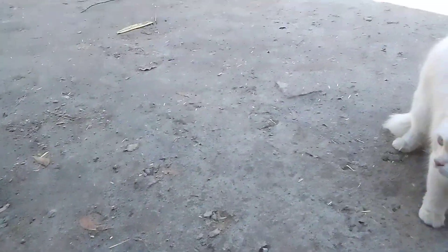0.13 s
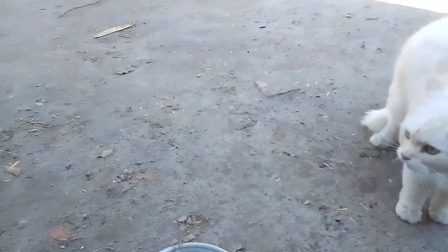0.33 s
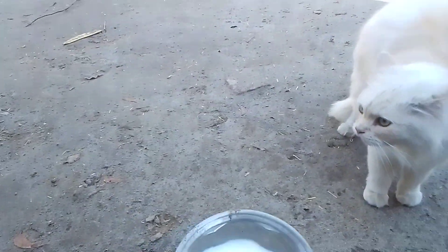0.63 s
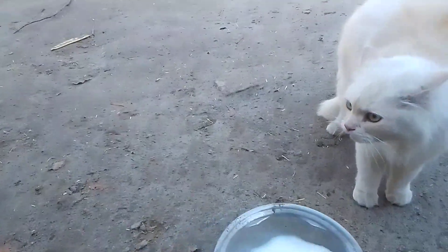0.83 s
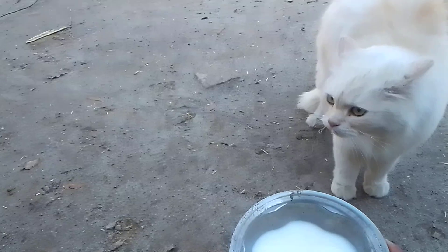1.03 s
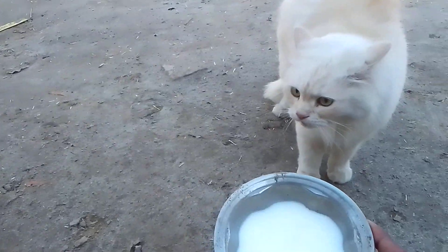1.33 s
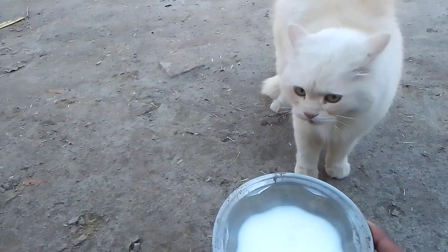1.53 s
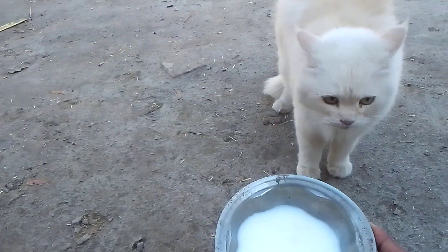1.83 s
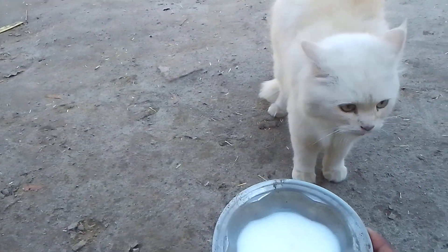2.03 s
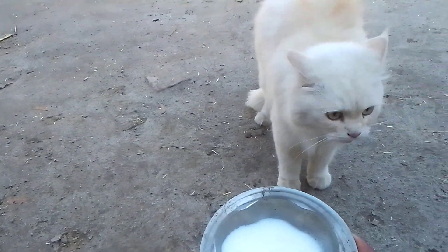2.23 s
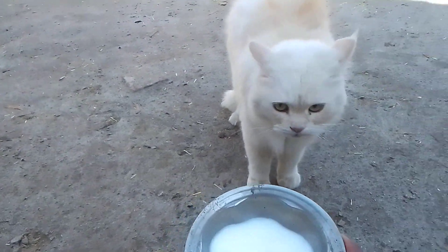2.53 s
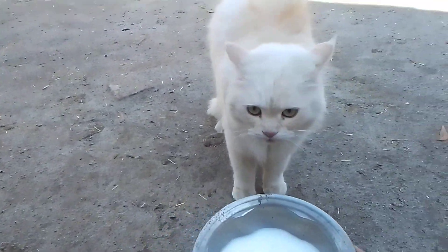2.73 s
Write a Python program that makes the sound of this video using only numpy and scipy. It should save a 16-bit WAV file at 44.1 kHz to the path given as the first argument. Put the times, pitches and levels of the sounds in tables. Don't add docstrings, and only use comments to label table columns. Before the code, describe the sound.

A cat yowls close by for the whole three seconds: a quiet closed-mouth hum until 0.25, then a wide, rough, raspy cry from 0.4 to 1.4, creeping up in pitch, clearer and highest near 1.9, then wavering, dropping and closing to a soft nasal hum. Faint yard murmur and hiss, tiny ticks, a dry click at 2.6, then a faint distant hoarse call and bird peep. Small microphone, little echo.

```python
import sys
import numpy as np
from scipy import signal
from scipy.fft import rfft, irfft, next_fast_len
from scipy.io import wavfile
from scipy.ndimage import uniform_filter1d, map_coordinates

SR = 44100
rng = np.random.default_rng(int(sys.argv[2]) if len(sys.argv) > 2 else 0)


def to_linear_factor(level_db):
    exponent = np.asarray(level_db, float) / 20
    return 10 ** exponent


def transcribe(signal):
    frames = np.atleast_2d(signal).T
    limited = np.clip(frames, -1, 1)
    pcm = np.round(limited * 32767).astype(np.int16)
    wavfile.write(sys.argv[1], SR, pcm)


N = 127890
STEP = 128

# (frequency [Hz], level [dB]); the last bounds them on both sides
MURMUR_SPECTRUM = [(20, -4.5), (55, -8), (150, -23), (270, -36.5), (380, 10), (1700, -5), (4700, -8.5),
                   (5600, -23)]
HISS_SPECTRUM = [(3000, -3), (10500, -1), (11650, 0), (12000, -12), (12350, 0), (15700, 1)]
SPECTRUM_ENDS = [(1, -60), (16500, -60)]
# (time [s], level [dB])
MURMUR_SWELL = [
    (0, -1.5),
    (1.5, -3.5),
    (2.3, -1),
    (2.7, -0.5),
    (2.88, 5.5),
]
MURMUR_DB, HISS_DB, PATCHY_DB = -68, -83.5, 1.5
HUM_HZ, HUM_DB = 206.5, -94.5

# (time [s], pitch [Hz])
CAT_PITCH = [(0, 392), (.12, 390), (.2, 382), (.3, 374), (.37, 376), (.41, 391), (.52, 402), (.64, 403),
             (.655, 410), (.72, 416), (.84, 431), (1.07, 433), (1.14, 442), (1.45, 444), (1.6, 451),
             (1.92, 464), (2.04, 457), (2.283, 436), (2.297, 412), (2.5, 390), (2.66, 337), (2.9, 335)]
# (time [s], pitch change [share], width [s])
PITCH_BENDS = [(2.06, -.038, .014), (2.085, .025, .008), (2.11, -.038, .018), (2.145, .015, .012),
               (2.176, -.05, .013), (2.21, .02, .025), (2.25, -.012, .01), (2.385, .025, .02),
               (2.42, -.022, .015), (1.715, .018, .015), (1.995, -.017, .014), (1.58, .015, .008),
               (.427, -.015, .008), (2.725, -.03, .012), (2.84, -.035, .02), (.447, .018, .008),
               (.47, -.018, .012), (.925, -.009, .008), (.98, -.012, .014), (1.075, -.015, .01),
               (1.19, -.01, .012), (1.283, -.012, .008), (1.335, .011, .01), (1.455, -.008, .012),
               (1.48, .012, .007), (1.525, .008, .012), (1.545, -.014, .008), (1.675, -.007, .01),
               (1.765, -.012, .014), (1.8, -.014, .01), (1.885, -.016, .008), (1.935, -.012, .006)]
# (time [s], level [dB])
CAT_EFFORT = [(0.0, -56), (0.04, -54), (0.19, -54), (0.3, -43.5), (0.44, -42), (.47, -41.5), (0.56, -43.5),
              (0.69, -38.5), (.78, -39), (.83, -39), (1.0, -40.5), (1.44, -41.5), (1.64, -39.5), (1.9, -43),
              (2.1, -48.5), (2.28, -49), (2.37, -50.5), (2.6, -52.5), (2.9, -52.5)]
# (time [s], half-pitch lines [dB], same high up [dB], breath [dB])
FOLD_STATE = [(0, -40, -30, -26), (.3, -38, -35, -28), (.36, -20, -20, -24), (.43, -3, -5, -14),
              (.5, 0, 0, -22), (.66, 0, 2, -22), (.8, 0, 2, -28), (1.1, -1, 3, -28), (1.27, -3, 3, -27),
              (1.4, -12, 0, -27), (1.52, -13, -2, -26), (1.62, -2, -2, -25), (1.69, -12, -12, -25),
              (1.75, -35, -30, -26), (1.95, -18, -22, -20), (2.2, -17, -22, -17), (2.33, -35, -30, -26),
              (2.6, -30, -30, -25), (2.9, -25, -25, -21)]
# (frequency [Hz], breath against lines [dB], half-pitch lines [dB])
SOURCE_TILT = [(200, 17, 8), (370, 0, -12.5), (740, -9.5, -8.5), (1270, -1, -3.5), (2400, 6.5, -2.5),
               (6000, 11, -4.5)]
# (time [s], mouth [Hz], tongue [Hz], mouth opening [dB], jaw drop [dB], brightness [dB])
MOUTH_SHAPE = [(0, 716, 2400, -13, -19, -19.5), (.18, 828, 2580, -2.5, -41, -16.5),
               (.26, 790, 2340, 13.5, -23, -9.5), (.31, 740, 2223, 14.5, -7, 2.5),
               (.43, 820, 2350, 12.5, -8.5, -5.5), (.58, 910, 2330, 14.5, -16, -8),
               (.7, 884, 2400, 14, -14, -4.5), (.85, 922, 2440, 15.5, -18, -4.5),
               (1.05, 866, 2350, 13.5, -13.5, -9), (1.2, 865, 2240, 12, -31.5, -10.5),
               (1.47, 905, 2300, 16, -34.5, -8.5), (1.75, 876, 2414, 19.5, -41, -11),
               (2.02, 883, 2210, 12.5, -38.5, -10), (2.27, 872, 2200, 5, -26, -11),
               (2.32, 817, 2110, -2, -3.5, -9), (2.52, 775, 1944, -3, -7, -7),
               (2.64, 616, 2070, -12, 9.5, -4), (2.9, 645, 1880, -14.5, 5, -7)]
# (time [s], throat [Hz], palate [Hz], ridge [Hz])
UPPER_PLACES = [(0, 4150, 6120, 3150), (.3, 3950, 6020, 3050), (.5, 4070, 6100, 3050),
                (.6, 3980, 6000, 3100), (.69, 4060, 5950, 3150), (.75, 3960, 5700, 3250),
                (.84, 4050, 5850, 3330), (.9, 4520, 6300, 3330), (.97, 4500, 6300, 3250),
                (1.06, 4300, 6100, 3200), (1.12, 4190, 6000, 3250), (1.42, 4190, 6050, 3250),
                (1.5, 4090, 6070, 3200), (1.7, 4100, 6050, 3200), (2.05, 4150, 6010, 3200),
                (2.3, 4500, 6200, 2900), (2.9, 4400, 6200, 3300)]
# (time [s], throat [dB], palate [dB], ridge [dB])
UPPER_LEVELS = [(0, 12.5, -23, 6), (.15, 12.5, -6, -6), (.3, -18.5, -32.5, -46), (.45, -17.5, -25.5, -32),
                (.53, -12.5, -29, -18), (.6, -19.5, -29, -20.5), (.69, -12, -30, -28),
                (.78, -24, -29.5, -24), (.86, -24.5, -43, -23), (.95, -25.5, -35, -20.5),
                (1.06, -22, -32.5, -17.5), (1.12, -14.5, -27.5, -16.5), (1.45, -13.5, -24, -19),
                (1.6, -17, -15.5, -18), (1.72, -10, -25.5, -15), (1.88, -17.5, -21.5, -22.5),
                (2.05, -23.5, -31.5, -31.5), (2.3, -21, -35, -31), (2.9, -7.5, -13, -26)]
# (frequency [Hz], width [Hz], level against the mouth [dB])
FIXED_RESONANCES = [(1710, 860, -23), (2810, 180, -28.5), (5100, 300, -49.5), (6960, 350, -47.5)]
# (frequency [Hz], width [Hz], level [dB])
WIDE_JAW_RESONANCES = [(6450, 450, -27), (7600, 400, -27), (11500, 500, -40), (14900, 1300, -33)]
# (time [s], level [dB])
JAW_GAPE = [
    (.25, -33),
    (.34, -13),
    (.55, -12),
    (.65, -14),
    (.8, -23),
    (.95, -25),
    (1.1, -29),
]
# (time [s], share of the flutter)
NOSE_FLUTTER = [(0, .3), (1, .4), (1.7, 1.2), (2.25, 1.3), (2.32, .3), (2.75, .4), (2.9, 1)]
JITTER, SHIMMER_DB, DRIFT_DB, NOSE_FLUTTER_DB = .0038, .7, 1.5, 2.8
NOSE_HZ, NOSE_WIDE_HZ = 399, 273
MOUTH_WIDE_HZ, TONGUE_WIDE_HZ, TONGUE_DB = 229, 300, -8
JAW_OVER_MOUTH, JAW_WIDE_HZ = 1.43, 480
THROAT_WIDE_HZ, PALATE_WIDE_HZ, RIDGE_WIDE_HZ = 300, 340, 420
SIDE_HZ, SIDE_WIDE_HZ = 3686, 350
HIGH_FROM_HZ, SPREAD_HZ = 2350, 1500
FLICKER_DB, FLICKER_STEPS = 3, 8

# (time [s], peak [dB], frequency [Hz], t60 [s])
TICKS = [
    (2.6085, -46, 2700, .003),
    (2.6135, -49, 4100, .0025),
    (2.44, -56, 2200, .003),
    (1.308, -60, 8000, .002),
    (.008, -60, 4200, .002),
    (.04, -61, 7600, .003),
    (.0405, -62, 4800, .003),
    (.113, -61, 3800, .002),
    (.452, -58, 9000, .0015),
]
CLICK_RISE_S = .0003
# (time [s], pitch [Hz], level [dB], breath [dB])
FAR_VOICE = [
    (2.6, 512, -95, -12),
    (2.612, 510, -62, -14),
    (2.68, 497, -64, -10),
    (2.72, 478, -71, 1),
    (2.78, 470, -76, 3),
    (2.81, 475, -72, -8),
    (2.85, 468, -71, -12),
    (2.87, 465, -95, -8),
]
# (frequency [Hz], width [Hz], level [dB])
FAR_RESONANCES = [(1510, 200, -5), (1930, 450, 0), (2480, 220, -8)]
# (start [s], length [s], frequency [Hz], level [dB])
BIRD_NOTE = (2.815, .08, 2830, -73)
GROUND_DB, ECHO_S = -25, .25
LOW_CUT_HZ = 300


def unit(x):
    return x / np.sqrt(np.mean(np.abs(x) ** 2) + 1e-20)


def curves(rows):
    s, *columns = np.transpose(rows)
    times = np.arange(N // STEP + 2) * STEP / SR
    return [np.interp(times, s, column) for column in columns]


def wobble(rate):
    knots = rng.standard_normal(int(N * rate / SR) + 6)
    return map_coordinates(knots, [np.arange(N // STEP + 2) * STEP * rate / SR])


def fine(control):
    return np.interp(np.arange(N), np.arange(len(control)) * STEP, control)


def ring(f, hz, wide_hz):
    return 1j * f * wide_hz / (hz * hz - f * f + 1j * f * wide_hz)


def filtered(x, response):
    m = next_fast_len(N + 8192)
    return irfft(rfft(x, m) * response(np.fft.rfftfreq(m, 1 / SR)), m)[:N]


def rush(spectrum, patchy_db):
    z = signal.stft(rng.standard_normal(N), nperseg=512)[2]
    field = uniform_filter1d(rng.standard_normal(z.shape), 5, 0)
    field = uniform_filter1d(field, 12, 1)
    x = signal.istft(z * to_linear_factor(patchy_db * unit(field)), nperseg=512)[1][:N]
    f, db = np.transpose([SPECTRUM_ENDS[0], *spectrum, SPECTRUM_ENDS[1]])
    return unit(filtered(x, lambda hz: to_linear_factor(np.interp(np.log(hz + 1), np.log(f), db))))


def yard():
    phase = 2 * np.pi * HUM_HZ * np.arange(N) / SR + fine(wobble(36))
    hum = fine(to_linear_factor(HUM_DB + 4.6 * wobble(25))) * np.sin(phase)
    murmur = fine(to_linear_factor(MURMUR_DB + curves(MURMUR_SWELL)[0])) * rush(MURMUR_SPECTRUM, PATCHY_DB)
    return murmur + to_linear_factor(HISS_DB) * rush(HISS_SPECTRUM, PATCHY_DB / 4) + hum


def folds(hz, odd_db, high_db, breath_db, tract, count):
    k = np.arange(1, count + 1)[:, None]
    f = k * hz
    noise = rng.standard_normal(f.shape) + 1j * rng.standard_normal(f.shape)
    tilt_hz, airy_db, skip_db = np.transpose(SOURCE_TILT)
    airy_db = np.interp(np.log(f), np.log(tilt_hz), airy_db)
    skip_db = np.interp(np.log(f), np.log(tilt_hz), skip_db)
    odd_db = odd_db + (high_db - odd_db) / (1 + (HIGH_FROM_HZ / f) ** 8)
    lines = np.where(k % 2, to_linear_factor(odd_db + skip_db), 1)
    colour = tract(f)
    flicker = uniform_filter1d(rng.standard_normal(f.shape), size=FLICKER_STEPS, axis=1)
    flicker = flicker * np.sqrt(FLICKER_STEPS)
    lines = lines * to_linear_factor(FLICKER_DB * flicker * np.clip(f / HIGH_FROM_HZ - .5, 0, 1))
    power = np.sum(np.abs(colour * lines) ** 2, 0)
    size = colour * (lines + to_linear_factor(breath_db + airy_db) * noise) / np.sqrt(power)
    phase = 2 * np.pi * np.cumsum(fine(hz)) / SR
    partials = (np.real(fine(row) * np.exp(1j * (i + 1) * phase)) for i, row in enumerate(size))
    return np.sqrt(2) * sum(partials)


def bank(f, rows):
    return sum(to_linear_factor(db + DRIFT_DB * wobble(11.06)) * np.abs(ring(f, hz, wide)) ** 3 for hz, wide, db in rows)


def cat_tract(f):
    mouth_hz, tongue_hz, open_db, jaw_db, bright_db = curves(MOUTH_SHAPE)
    throat_hz, palate_hz, ridge_hz = curves(UPPER_PLACES)
    throat_db, palate_db, ridge_db = curves(UPPER_LEVELS)
    tongue = ring(f, tongue_hz, TONGUE_WIDE_HZ) ** 2
    ridge = ring(f, ridge_hz, RIDGE_WIDE_HZ)

    upper = to_linear_factor(TONGUE_DB) * np.abs(tongue) + bank(f, FIXED_RESONANCES)
    upper = upper + to_linear_factor(curves(JAW_GAPE)[0]) * bank(f, WIDE_JAW_RESONANCES)
    upper = upper + to_linear_factor(throat_db) * np.abs(ring(f, throat_hz, THROAT_WIDE_HZ)) ** 3
    upper = upper + to_linear_factor(palate_db) * np.abs(ring(f, palate_hz, PALATE_WIDE_HZ)) ** 3
    upper = upper + to_linear_factor(ridge_db) * np.abs(ridge) ** 3
    dispersion = (np.maximum(f - HIGH_FROM_HZ, 0) / SPREAD_HZ * 2) ** 2
    upper = upper * np.exp(1j * (np.angle(tongue * ridge ** 2) - dispersion))
    upper = upper * (1 - ring(f, SIDE_HZ, SIDE_WIDE_HZ))

    jaw = to_linear_factor(jaw_db) * ring(f, JAW_OVER_MOUTH * mouth_hz, JAW_WIDE_HZ) ** 3
    mouth = ring(f, mouth_hz, MOUTH_WIDE_HZ) ** 2 - jaw
    flutter = to_linear_factor(NOSE_FLUTTER_DB * curves(NOSE_FLUTTER)[0] * wobble(100))
    nose = flutter * ring(f, NOSE_HZ, NOSE_WIDE_HZ) ** 2
    return nose + to_linear_factor(open_db) * (mouth + to_linear_factor(bright_db) * upper)


def cat():
    pitch, effort_db = curves(CAT_PITCH)[0], curves(CAT_EFFORT)[0]
    half_db, high_db, breath_db = curves(FOLD_STATE)
    t = np.arange(len(pitch)) * STEP / SR
    bend = sum(share * np.exp(-np.abs((t - s) / wide) ** 3) for s, share, wide in PITCH_BENDS)
    jitter = JITTER * np.clip(t / 1.1, .4, 1.3) * (0.35 * wobble(40) + wobble(120))
    pitch = pitch * (1 + bend + jitter)
    voice = folds(pitch / 2, half_db + 0.5 * wobble(10), high_db, breath_db, cat_tract, count=72)
    return voice * fine(to_linear_factor(effort_db + SHIMMER_DB * wobble(34.07)))


def clicks():
    out, t = np.zeros(N), np.arange(600) / SR
    for s, db, hz, t60 in TICKS:
        envelope = to_linear_factor(db - 60 * t / t60) * (1 - np.exp(-t / CLICK_RISE_S))
        out[round(s * SR):][:600] += envelope * np.sin(2 * np.pi * hz * t)
    return out


def far_tract(f):
    return sum((-1) ** k * to_linear_factor(db) * ring(f, hz, wide) ** 2 for k, (hz, wide, db) in enumerate(FAR_RESONANCES))


def far_call():
    pitch, level_db, breath_db = curves(FAR_VOICE)
    half_pitch = pitch / 2 * (1 + .006 * wobble(40))
    odd_db = -40 + breath_db
    return folds(half_pitch, odd_db, odd_db, breath_db, far_tract, count=14) * fine(to_linear_factor(level_db))


def peep():
    s, length, hz, db = BIRD_NOTE
    t = np.arange(N) / SR
    shape = np.sqrt(np.abs(np.sin(np.pi * np.clip((t - s) / length, 0, 1))))
    return shape * fine(to_linear_factor(db + 4 * wobble(60))) * np.sin(2 * np.pi * hz * t + fine(wobble(61)))


def low_cut(f):
    return (1j * f / (1j * f + LOW_CUT_HZ)) ** 2 / (1 + (LOW_CUT_HZ / (f + 1)) ** 14)


def scene():
    near = -cat() + far_call() + peep() + clicks()
    t = np.arange(SR // 4) / SR
    tail = rng.standard_normal(len(t)) * to_linear_factor(-60 * t / ECHO_S)
    near = near + to_linear_factor(GROUND_DB) * signal.fftconvolve(near, tail / np.linalg.norm(tail))[:N]
    return (filtered(near, low_cut) + yard())[None]


def top_cut(x):
    return signal.sosfilt(signal.butter(12, 15770, fs=SR, output="sos"), x)


def record(dry):
    return top_cut(dry)


dry = scene()
out = record(dry)
transcribe(out)
```